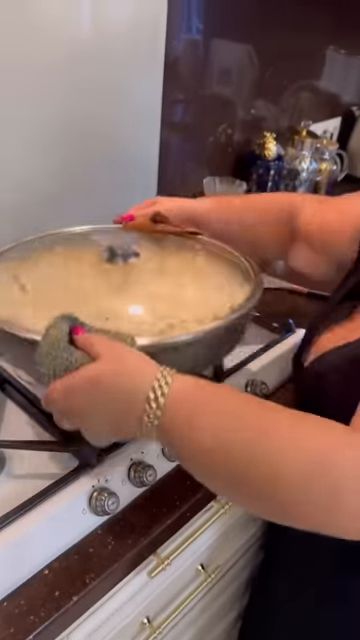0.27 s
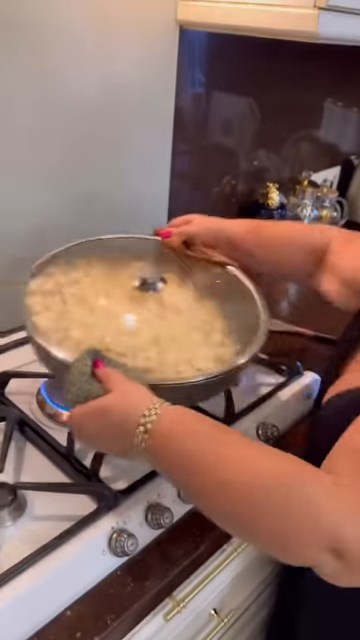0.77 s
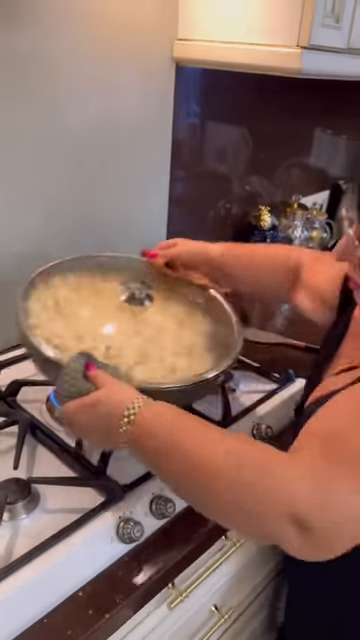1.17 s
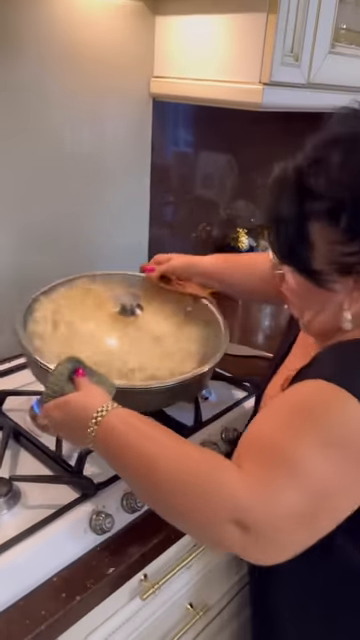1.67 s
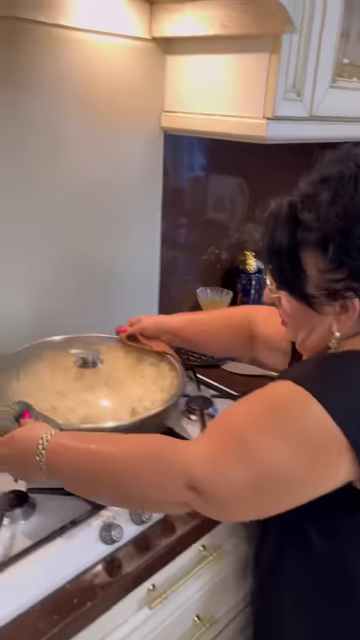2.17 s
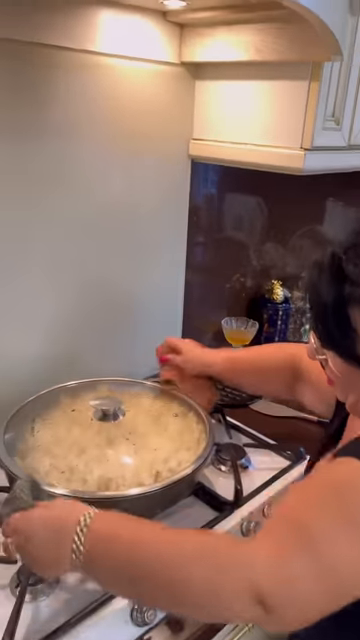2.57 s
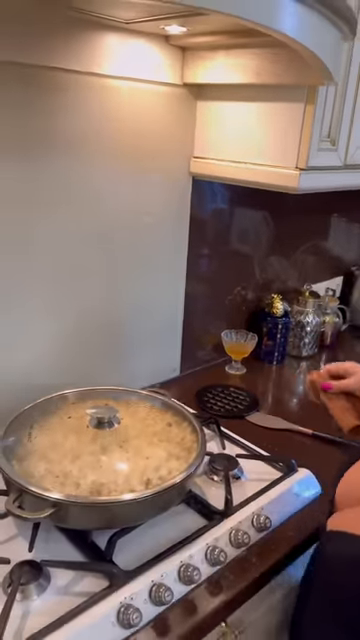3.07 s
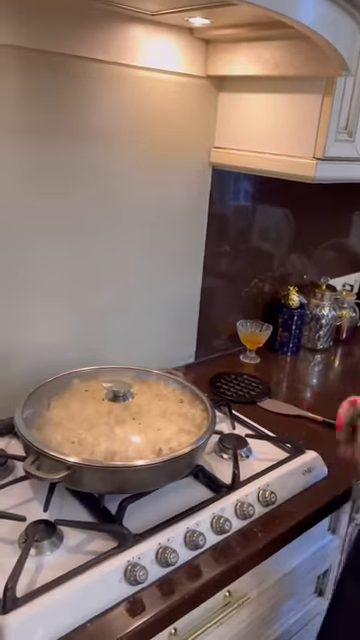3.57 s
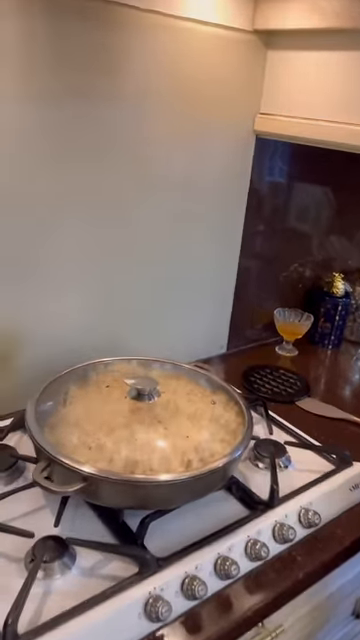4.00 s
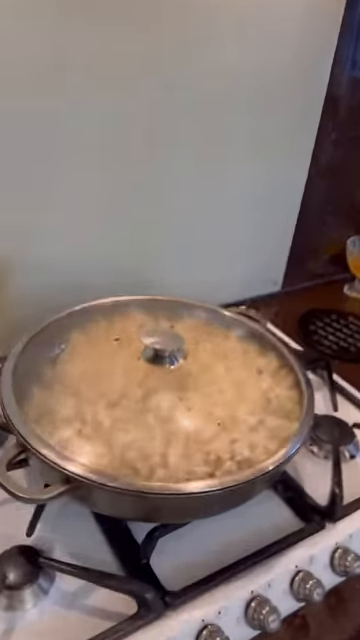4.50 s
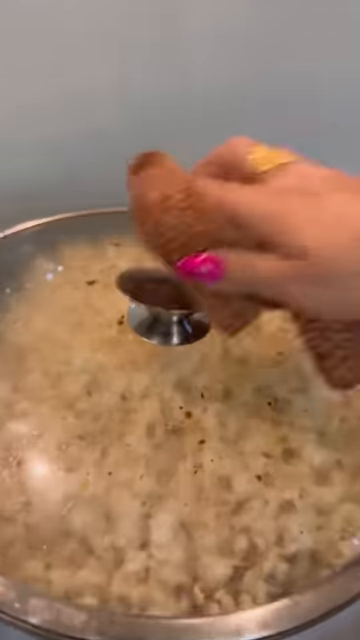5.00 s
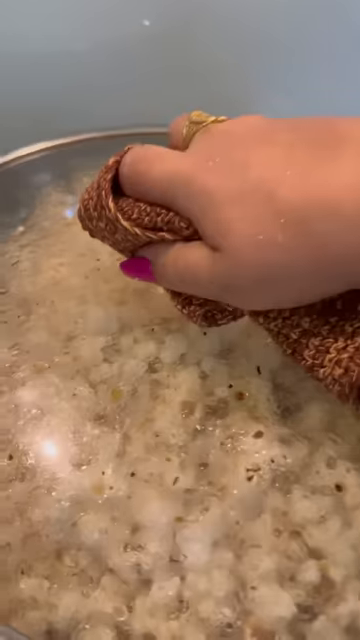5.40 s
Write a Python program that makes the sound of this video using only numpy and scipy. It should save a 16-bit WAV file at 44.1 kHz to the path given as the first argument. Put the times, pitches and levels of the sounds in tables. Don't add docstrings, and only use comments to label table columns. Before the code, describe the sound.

A wide lidded pan of popcorn is heard close up in a small, slightly reverberant kitchen. From 0 s, irregular dry cracks and hollow low thumps come through a breathy gas and steam hiss, with loose corn rustling in surges as the pan is carried; the hiss is strongest from about 0.5 to 1.9 s. Around 1.5 to 2 s the heavy base drags dully over the grate. At 2.0 s its edge knocks with quick bounces, and at 2.2 s the full base lands in a louder, deeper metallic clank, rattling and rocking until about 2.4 s. The hiss then thins, and muffled pops continue in small clusters until 4.5 s. From 4.6 s the microphone is close above the lid: snaps are brighter and louder, notably near 4.67 and 5.34 s, with glassy ticks and splinters. From 5.5 s the lid rocks with low bumps and ticks as hiss rises again.

```python
import sys
import numpy as np
from scipy import signal
from scipy.fft import rfft, irfft, next_fast_len
from scipy.io import wavfile

SR = 44100
rng = np.random.default_rng(int(sys.argv[2]) if len(sys.argv) > 2 else 0)


def to_linear_factor(level_db):
    exponent = np.asarray(level_db, float) / 20
    return 10 ** exponent


def dump(signal):
    limited = np.clip(np.atleast_2d(signal).T, -1, 1)
    pcm = np.round(limited * 32767).astype(np.int16)
    wavfile.write(sys.argv[1], SR, pcm)


N = 249045
BURST = 6144
STEP, RUN_IN = 32, 3000
LEFT_RIGHT = np.array([[1], [-1]])


def rms_one(x):
    return x / np.sqrt(np.mean(x ** 2) + 1e-20)


def peak_one(x):
    return x / np.abs(x).max()


def at_hz(points, hz):
    table_hz, values = np.array(points).T[:2]
    return np.interp(np.log(hz), np.log(table_hz + 1), values)


def in_time(rows, step=1, outside=None):
    s, *columns = np.transpose(rows)
    t = np.arange(0, N, step) / SR
    return [np.interp(t, s, column, outside, outside) for column in columns]


def drift(rate_hz):
    r = np.exp(-2 * np.pi * STEP * rate_hz / SR)
    white = rng.standard_normal(len(range(0, N, STEP)) + RUN_IN)
    return rms_one(signal.lfilter([1], [1, -2 * r, r * r], white)[RUN_IN:])


def ring(clicks, hz, t60):
    r = to_linear_factor(-60 / (max(t60, .002) * SR))
    w = 2 * np.pi * hz / SR
    return signal.lfilter([0, np.sin(w)], [1, -2 * r * np.cos(w), r * r], clicks + 1e-18)


def band(x, low_hz, high_hz):
    return signal.sosfilt(signal.butter(2, [low_hz, high_hz], "band", fs=SR, output="sos"), x)


def top_cut(x, hz):
    return signal.sosfilt(signal.ellip(12, .3, 85, hz, fs=SR, output="sos"), x)


def add(out, s, sound):
    i = round(s * SR)
    out[i:i + len(sound)] += sound[:N - i]


def blow(t, s, rise, t60):
    age = np.maximum(t - s, 0)
    return (1 - np.exp(-age / max(rise, 1e-4))) * to_linear_factor(-60 * age / t60)


def grains(per_s, spread_db):
    sizes = to_linear_factor(spread_db * np.minimum(rng.exponential(1, N), 5)) * rng.choice([-1, 1], N)
    return rms_one(sizes * (rng.random(N) < per_s / SR))


# start_s, crack_db, steam_puff_db, cavity_thump_db
CARRIED_POPS = [(0.1312, -28.5, -56, -64), (0.143, -20.5, -27.5, -37.5), (0.2095, -24.5, -54, -58),
                (0.3716, -36, -57, -28.5), (0.5317, -23, -48, -36), (0.6135, -35, -51, -54),
                (0.6956, -36, -52, -24), (0.7535, -27, -34, -35), (1.4122, -26.5, -38, -31),
                (1.4746, -32, -46, -27), (1.713, -26, -37, -27.5), (2.175, -35, -33.5, -45)]
# start_s, crack_db, steam_puff_db, cavity_thump_db
RESTING_POPS = [(2.367, -33, -38, -34), (2.508, -43, -50, -40), (2.582, -33, -40.5, -26),
                (2.749, -27.5, -35.5, -23), (2.8883, -43, -47, -57), (2.9333, -32.5, -32.5, -33),
                (3.1625, -28, -39, -27), (3.277, -33, -41, -33.5), (3.31, -30, -42.5, -38),
                (3.47, -37, -49, -32), (3.5421, -37, -45.5, -32), (3.5717, -37, -38.5, -33),
                (3.602, -23, -30.5, -34), (3.649, -33.5, -38.5, -31), (3.7333, -37.5, -48.5, -26.5),
                (3.8582, -46, -52, -33), (3.912, -32, -34, -29.5), (3.938, -37, -64, -43),
                (3.989, -23.5, -31.5, -31), (4.0002, -31, -51, -35), (4.081, -39.5, -50, -33),
                (4.187, -43, -36.5, -30), (4.266, -43, -46.5, -50), (4.2838, -36, -41.5, -45),
                (4.388, -35.5, -51, -41), (4.406, -35, -42, -35), (4.439, -36.5, -45, -58),
                (4.5158, -36.5, -45, -44)]
# start_s, crack_db, steam_puff_db, cavity_thump_db
CLOSE_POPS = [(4.5963, -22.5, -30, -21), (4.6126, -23.5, -57, -30), (4.648, -29, -33, -23),
              (4.6599, -17.5, -36, -25), (4.6694, -16.5, -39, -45), (4.725, -23.5, -30, -23.5),
              (4.801, -22, -36, -27), (4.8798, -35.5, -46, -25), (4.9938, -52, -45, -64),
              (5.1409, -27.5, -28, -30), (5.1609, -33, -40, -53), (5.245, -39, -46, -34),
              (5.328, -24.5, -34.5, -42), (5.3382, -12.5, -28.5, -28), (5.367, -54, -45, -37),
              (5.4586, -29.5, -30, -15.5), (5.4819, -32, -60, -40), (5.4998, -25.5, -37, -17),
              (5.5106, -31.5, -41, -42), (5.5243, -34, -40, -25), (5.564, -42, -32, -38),
              (5.6136, -30, -37, -45)]
POPS = CARRIED_POPS + RESTING_POPS + CLOSE_POPS
# pitch_hz, level_db, t60_s
LID_AIR = [(810, 0, .04), (1300, 0, .035), (1770, 0, .03), (2220, 0, .03), (2680, -4, .022),
           (3400, -5, .02), (4200, -11, .015)]


def cracks(air_db=-4.5, puff_db=12.5, snap_t60=0.0037, spurt_t60=0.092, jet_t60=0.012, spread=0.9):
    out, t = np.zeros((2, N)), np.arange(BURST) / SR
    split_at = [0, round(0.00024 * SR)]
    for s, level_db, bright_db, _ in POPS:
        tail_db = -10.5 - 0.36 * (level_db + 40.0)
        shape = blow(t, 0, .0001, snap_t60) + to_linear_factor(tail_db) * blow(t, 0, 0.00084, spurt_t60)
        jet_shape = blow(t, 0, 0.00042, jet_t60) + to_linear_factor(tail_db + 4.5) * blow(t, 0, 0.0025, spurt_t60)
        spurt, jet, scatter = rng.standard_normal((3, BURST)) * [shape, jet_shape, jet_shape]
        split_db = 4.0 + 0.65 * (level_db + 20.0)
        spurt[split_at] = to_linear_factor(split_db) * np.array([1, -2.1])
        air = 0
        for (hz, db, t60), uneven_db in zip(LID_AIR, 2 * rng.standard_normal(len(LID_AIR))):
            air = air + to_linear_factor(db + uneven_db) * peak_one(ring(spurt, hz, t60))
        body = to_linear_factor(-4.5) * peak_one(band(spurt, 1060, 2810))
        body += to_linear_factor(air_db) * peak_one(band(air, 480, 16000))
        steam = band(np.array([jet, scatter * to_linear_factor(-60 * t / 0.033)]), 4540, 14200)
        puff, glance = to_linear_factor(bright_db + puff_db) * peak_one(steam)
        centre = to_linear_factor(level_db) * body + puff
        add(out[0], s, centre + spread * glance)
        add(out[1], s, centre - spread * glance)
    return out


# start_s, level_db
BURIED_POPS = [(0.115, -27), (0.301, -29.5), (0.361, -31.5), (0.482, -34), (0.719, -36), (0.775, -31),
               (0.837, -40), (0.957, -53), (1.095, -33), (1.179, -42), (1.272, -42), (1.854, -33),
               (2.639, -34), (2.84, -38), (3.237, -34), (3.332, -46), (3.836, -40), (4.277, -29),
               (4.689, -29), (4.779, -28), (4.829, -21.5), (4.908, -32)]
# start_s, level_db, cavity_hz, knock_db (relative to the thump)
LID_JUMPS = [
    (0.208, -25, 130, -12.5),
    (1.089, -29, 375, -41),
    (5.16, -22.5, 140, -2.5),
    (2.222, -20.5, 142, 0.5),
    (2.293, -23, 131, -24),
    (5.5232, -13.5, 290.5, -23),
    (5.58, -17.5, 357, -22),
    (5.619, -29, 275, -10),
]
CAVITY_HZ, CAVITY_SPREAD, THUMP_LAG_S = 145, .09, -0.00097


def thump_rows():
    rows = []
    for s, crack_db, _, db in POPS:
        rows.append((s + THUMP_LAG_S, db, -10 + 0.43 * np.clip(crack_db - db, -15, 20)))
    rows += [(s, db, -18) for s, db in BURIED_POPS]
    pitched = []
    for s, db, knock_db in rows:
        hz = CAVITY_HZ * np.exp(CAVITY_SPREAD * rng.standard_normal())
        pitched.append((s, db, hz, knock_db))
    return pitched + LID_JUMPS


def thumps(swing_t60=0.096, push_s=0.0038, slap_s=0.0016, knock_t60=0.1):
    out, t = np.zeros(N), np.arange(BURST) / SR
    push, slap = (np.sin(np.pi * np.minimum(t / s, 1)) ** 2 for s in (push_s, slap_s))
    slap = peak_one(band(slap, 194, 348))
    for s, level_db, hz, knock_db in thump_rows():
        swing = peak_one(ring(ring(push, hz, 0.0045), hz, swing_t60))
        swing += to_linear_factor(-6.5) * peak_one(ring(push, hz * 1.475, swing_t60))
        rattle = band(rng.standard_normal(BURST) * blow(t, 0, 0.0003, knock_t60), 300, 820)
        knock = peak_one(rattle) + 1.2 * slap
        add(out, s + 0.0008, to_linear_factor(level_db - 3.5) * (peak_one(swing) + to_linear_factor(knock_db + 3.0) * knock))
    return out


# start_s, peak_db, pitch_hz, t60_s
SNAPS = [(.143, -35, 12500, .03), (2.173, -26, 11000, 0.0067), (2.9332, -30, 12500, .006),
         (3.1623, -30, 12500, .006), (3.5725, -33, 12500, .006), (3.6494, -30, 12500, .006),
         (3.989, -39, 12000, .005), (4.6484, -40, 12500, .02), (4.6594, -40, 12500, .03),
         (4.6696, -17, 2500, 0.0042), (4.669, -41, 12500, .03), (4.725, -42, 12500, .01),
         (5.141, -27, 12500, .05), (5.3348, -40, 12600, .012), (4.6625, -25, 6500, .01),
         (4.6686, -11, 5940, 0.0062), (4.6715, -24, 6400, .04), (4.615, -33, 1500, .04),
         (4.672, -22, 1500, 0.031), (4.690, -48, 1600, 0.025), (4.7275, -21, 7500, 0.022),
         (4.744, -47, 1200, 0.044), (4.8038, -32, 2200, .025), (4.832, -43, 1500, 0.064),
         (4.8335, -43, 7000, .02), (5.1464, -23, 5800, .02), (5.162, -16.5, 7450, 0.004),
         (5.161, -27, 13000, 0.032), (5.3345, -13.5, 7500, 0.0045), (5.3343, -24.5, 2020, 0.0036),
         (5.3497, -27, 6500, 0.01), (5.4595, -21, 13000, .006), (5.544, -41, 1500, .015),
         (5.5693, -49, 2500, .015), (5.5935, -39, 1500, 0.016), (5.598, -34, 1800, .015),
         (5.6058, -48, 1500, .015), (5.6205, -39, 2000, .015), (5.6258, -37, 2000, 0.013),
         (5.631, -30, 3500, 0.017), (5.6374, -38, 2000, .015)]


def snaps(half_width_octaves=0.48):
    out, t = np.zeros(N), np.arange(BURST) / SR
    ratio = 2 ** half_width_octaves
    for s, level_db, hz, t60 in SNAPS:
        burst = rng.standard_normal(BURST) * blow(t, 0, 0.00018, t60)
        add(out, s, to_linear_factor(level_db) * peak_one(band(burst, hz / ratio, min(hz * ratio, .45 * SR))))
    return out


# start_s, pitch_hz, peak_db, t60_s
CLINKS = [(0.2095, 1400, -33, .01), (1.03, 992, -50, 0.45), (1.045, 378, -45.5, 0.66),
          (1.085, 990, -49, .3), (1.2, 804, -53, .3), (1.36, 368.5, -46, 0.34), (1.411, 790, -31, 0.049),
          (1.414, 1740, -42, .06), (1.987, 930, -34, 0.1), (2.005, 312, -28, .12),
          (2.032, 242, -24.5, 0.21), (2.008, 688, -29, 0.088), (2.045, 330, -26, .15),
          (2.114, 293, -30, .1), (2.221, 660, -19.5, 0.13), (2.222, 140, -15, 0.14),
          (2.226, 836, -22, 0.088), (2.238, 590, -19.5, 0.26), (2.265, 80, -31, .5),
          (2.251, 233.5, -23.5, 0.25), (2.3, 202, -29, 0.18), (2.312, 134.5, -21, 0.28),
          (2.361, 279, -33, .2), (4.186, 1580, -43, 0.097), (4.223, 1350, -43, 0.043),
          (4.6715, 1284, -26, .06), (4.733, 800, -37, 0.056), (4.752, 794, -38, 0.048),
          (4.669, 2510, -7.5, 0.0053), (4.6687, 4400, -15.5, .003), (4.6681, 7000, -24, .003),
          (4.6717, 1620, -32, .05), (5.1612, 700, -32, 0.012), (5.179, 1380, -39, .02),
          (5.264, 1490, -46, 0.032), (5.3378, 910, -25, 0.015), (5.461, 2150, -40, .03),
          (5.5, 810, -40, .06), (5.526, 850, -33.5, .06), (5.545, 1360, -45, .03),
          (5.565, 1380, -43, 0.054), (5.601, 1330, -41, 0.045), (5.622, 1820, -38, .06),
          (5.634, 403, -38, .06)]


def clinks():
    out, click = np.zeros(N), np.eye(1, 4 * BURST)[0]
    for s, hz, level_db, t60 in CLINKS:
        add(out, s, to_linear_factor(level_db) * peak_one(ring(click, hz, t60)))
    return out


# start_s, pitch_hz, peak_db, t60_s
TICKS = [(0.128, 1360, -35.5, 0.049), (0.689, 2040, -36, 0.084), (3.9148, 1610, -37, 0.036),
         (4.184, 1570, -37.5, 0.054), (4.185, 4270, -41, 0.094), (4.922, 1450, -42, 0.036),
         (5.362, 770, -48, 0.056), (5.4757, 1354, -29, 0.065), (5.508, 1340, -33, 0.069),
         (5.524, 1345, -33, 0.085), (5.612, 1816, -35, 0.071), (5.617, 1350, -36, 0.078),
         (5.631, 1790, -33, 0.023)]


def ticks():
    out, t = np.zeros(N), np.arange(BURST) / SR
    for s, hz, level_db, t60 in TICKS:
        scuff = rng.standard_normal(BURST) * blow(t, 0, 0.00011, 0.018)
        add(out, s, to_linear_factor(level_db) * peak_one(ring(scuff, hz, t60)))
    return out


# start_s, level_db, judder_rise_s, judder_t60_s
KNOCKS = [
    (1.984, -18.5, 0.015, 0.12),
    (2.218, -14, 0.0077, 0.13),
    (2.292, -24, 0.11, 0.3),
]
# pitch_hz, level_db, t60_s
FIRST_BODY = [(192, -28, 0.66), (242, -6, 0.3), (302, -2.5, 0.28), (330, 1, 0.23), (410, -30, 0.28),
              (493, -2.5, 0.12), (580, -12, 0.21), (694, -8, 0.2), (945, -18, 0.27), (982, -15, 0.73),
              (1333, -25, 0.33)]
# pitch_hz, level_db, t60_s
FULL_BODY = [(80, 0, 0.6), (140, -18, 0.11), (232, -2, 0.37), (359, 0, 0.32), (450, -10, 0.24),
             (515, 1, 0.34), (594, 2, 0.55), (650, -15, 0.1), (730, -8, 0.62), (858, 8.5, 0.12),
             (930, -15, .15), (982, 8, 0.12), (1100, -20, .3), (1270, -23, 0.35)]
# pitch_hz, level_db, t60_s
SETTLE_BODY = [(80, 1.5, 0.39), (134, 4, 0.33), (197, -3, 0.17), (273, -1, 0.25), (349, -14, 0.3),
               (530, -6, 0.66), (600, -17, 0.45), (660, -7, 0.22), (717, -14, 0.26)]
# start_s, level_db
FIRST_CONTACTS = [(1.992, -13), (1.998, 5), (2.001, 1.5), (2.008, 0), (2.015, -8), (2.022, 4.5), (2.03, -2),
                  (2.036, -9), (2.048, -13), (2.0607, -10)]
# start_s, level_db
FULL_CONTACTS = [(2.2182, -5), (2.2218, 9), (2.2302, 11), (2.2385, 1), (2.2454, 0), (2.2525, -9),
                 (2.2623, -16), (2.2688, -10.5), (2.275, -12), (2.2854, -10), (2.2907, -18)]
# start_s, level_db
SETTLE_CONTACTS = [(2.2984, 2), (2.307, 7), (2.3145, -12), (2.3241, -1), (2.338, 3), (2.3413, 5),
                   (2.352, -16), (2.371, -6)]


def knocks(ring_db=-1.0, judder_db=-10.0, clack_db=-5.0):
    out, t = np.zeros(N), np.arange(N) / SR
    bodies = (FIRST_BODY, FULL_BODY, SETTLE_BODY)
    bounces = (FIRST_CONTACTS, FULL_CONTACTS, SETTLE_CONTACTS)
    for (s, level_db, rise, t60), body, contacts in zip(KNOCKS, bodies, bounces):
        judder = to_linear_factor(judder_db) * peak_one(grains(450.0, spread_db=6.0) * blow(t, s, rise, t60))
        contact_s, hit_db = np.transpose(contacts)
        at = (contact_s * SR).astype(int)
        hits, rings = np.zeros(N), 0
        hits[at] = to_linear_factor(hit_db)
        uneven = rng.standard_normal((len(at), len(body)))
        for (hz, db, decay), share in zip(body, uneven.T):
            strikes = judder.copy()
            strikes[at] += to_linear_factor(hit_db + 3.6 * share)
            rings = rings + to_linear_factor(db) * ring(strikes, hz, np.clip(decay, .03, .7))
        clack = band(band(hits, 380, 1550), 280, 2500)
        knock = to_linear_factor(ring_db) * peak_one(rings) + to_linear_factor(clack_db) * peak_one(clack)
        out += to_linear_factor(level_db + 4.0) * knock
    return out


DRAG_S, DRAG_DB, DRAG_EASE_DB, DRAG_EDGE_DB = 1.47, -38, -12, -34
DRAG_RISE_S, DRAG_HOLD_S, DRAG_EASE_S, DRAG_CREEP_S = 0.035, 0.07, 0.18, 0.26


def drag():
    slips = grains(900.0, spread_db=2.0)
    s = DRAG_S + np.cumsum([0, DRAG_RISE_S, DRAG_HOLD_S, DRAG_EASE_S, DRAG_CREEP_S, DRAG_RISE_S / 2])
    db = DRAG_DB + np.array([DRAG_EDGE_DB, 0, 0, DRAG_EASE_DB, DRAG_EASE_DB, DRAG_EDGE_DB])
    level_db = in_time(np.transpose([s, db]), outside=-120)[0]
    grate = ring(slips, 257, 0.12) + 1.36 * ring(slips, 330, 0.043)
    return to_linear_factor(level_db + 4.5) * rms_one(grate)


# start_s, level_db
STEAM = [(0.0, -48), (0.12, -52.5), (0.3, -49.5), (0.55, -40), (0.69, -38.5), (1.07, -38.5), (1.57, -40),
         (1.82, -39.5), (2.03, -47), (2.25, -42.5), (2.41, -52.5), (2.99, -49), (3.52, -55), (4.55, -55),
         (4.8, -50.5), (5.44, -52), (5.57, -43), (5.65, -40)]
# centre_s, extra_rustle_db, extra_hiss_db, extra_far_pops_db, half_width_s
JOLTS = [
    (.14, 8.5, 9.5, 0, 0.078),
    (.3, 10, 7.5, -3, 0.081),
    (.74, 4, 6.5, 5, 0.059),
    (1.12, 0, 1.5, 0.5, 0.073),
    (1.58, 6, 4, 4, 0.083),
    (2.09, 9, -6.5, -1, 0.06),
    (2.27, -0.5, -4.5, 22, 0.11),
    (4.77, 1.5, -2, 10, 0.14),
    (5.579, -2, 0.5, 9, 0.18),
]
MIDDLING_STEAM_DB = -47
RUSTLE_DB, RUSTLE_FOLLOWS = -49.5, 0.61
FAR_POPS_DB, FAR_FOLLOWS = -55, 0.06


def bed_levels(step):
    hiss, t = in_time(STEAM, step)[0], np.arange(0, N, step) / SR
    swing = hiss - MIDDLING_STEAM_DB
    rustle = RUSTLE_DB + RUSTLE_FOLLOWS * swing
    muffled = FAR_POPS_DB + FAR_FOLLOWS * swing
    for s, rustle_db, hiss_db, far_db, width in JOLTS:
        bump = np.exp(-((t - s) / width) ** 2)
        hiss = hiss + hiss_db * bump
        rustle = rustle + rustle_db * bump
        muffled = muffled + far_db * bump
    return hiss, rustle, muffled


# pitch_hz, level_db, t60_s
PAN_WALL = [(375, 4, 0.7), (651, 1, 0.44), (984.6, 1.5, 0.24), (1488, 5.5, 0.03), (1993, -0.5, 0.12),
            (2213, 1, 0.25), (2660, -1, 0.08), (3646, 0, 0.19), (4520, 1.5, 0.11), (5640, -1.5, 0.023),
            (5900, -17.5, 0.036), (6380, -5, 0.11), (7100, 4, 0.02)]


def sliding_corn(level_db=-6.0):
    touches = grains(900.0, spread_db=3.0)
    tones = sum(to_linear_factor(db) * rms_one(ring(touches, hz, t60)) for hz, db, t60 in PAN_WALL)
    return to_linear_factor(bed_levels(1)[1] + level_db) * rms_one(tones)


BANDS_HZ = 28 * 2 ** np.arange(0, 9.4, .4)


def power_share(spectrum, level_db, hz):
    total = np.sum(to_linear_factor(at_hz(spectrum, BANDS_HZ)) ** 2 * BANDS_HZ)
    return to_linear_factor(level_db + at_hz(spectrum, hz)) ** 2 * hz / total


# pitch_hz, level_db (per Hz)
HISS = [(1500, -19.5), (3000, -5.5), (4200, -7.5), (5200, -0.5), (7000, -4), (9000, -1.5), (11000, -3.5),
        (13000, -13), (16000, -2.5)]
# pitch_hz, level_db (per Hz)
RUSTLE = [(250, -22), (400, -1.5), (600, 3), (1000, -1.5), (2000, -1.5), (3500, -20), (5000, -39),
          (9000, -10)]
# pitch_hz, level_db (per Hz)
MUFFLED = [(25, 5), (60, -5), (100, 2), (140, 4), (200, -1), (300, -0.5), (500, -28), (1000, -44)]
# pitch_hz, level_db (per Hz)
FIRST_CLATTER = [(60, -45), (120, -42), (200, -5), (280, -7), (500, -7), (1100, -18), (1600, -19),
                 (2000, -12.5), (4200, -25.5), (9000, -29), (16000, -30)]
# pitch_hz, level_db (per Hz)
FULL_CLATTER = [(50, -7), (120, -11), (250, -6), (400, -8.5), (600, -3), (1300, -12), (3000, -16.5),
                (5500, -20), (9000, -20), (13000, -34), (16000, -22)]
# pitch_hz, level_db (per Hz)
SETTLE_CLATTER = [(60, -32), (120, -21), (250, -10), (500, -15), (1100, -22), (2500, -14.5), (9000, -27),
                  (16000, -22)]
# pitch_hz, t60_s
CLATTER_T60 = [(60, 0.87), (600, 0.58), (2000, 0.35), (10000, 0.29)]
# pitch_hz, likeness (0-1)
LIKENESS = [(60, .998), (150, .99), (290, .96), (640, .62), (1000, .85), (1400, .96), (1800, .99),
            (2400, .96), (3100, .7), (4100, .6), (5400, .84), (7200, .995), (8500, .97), (10500, .999),
            (13500, .999), (16500, .9)]


def diffuse_noise(hiss_db=5.0, rustle_db=0.0, muffled_db=3.0):
    hiss, rustle, muffled = bed_levels(STEP)
    t, together = np.arange(0, N, STEP) / SR, drift(9.0)
    white, out = rng.standard_normal((2, 2, N)), 0
    clatters = (FIRST_CLATTER, FULL_CLATTER, SETTLE_CLATTER)
    for k, hz in enumerate(BANDS_HZ):
        mid, side = rms_one(band(white[k % 2], hz / 2 ** .2, min(hz * 2 ** .2, .45 * SR)))
        power = power_share(HISS, hiss + hiss_db, hz)
        power += power_share(RUSTLE, rustle + rustle_db, hz)
        power += power_share(MUFFLED, muffled + muffled_db, hz)
        power *= to_linear_factor(1.1 * together + 1.4 * drift(13.2) + 0.69 * drift(58.0)) ** 2
        for (s, level_db, rise, _), colour in zip(KNOCKS, clatters):
            tail = blow(t, s, rise, at_hz(CLATTER_T60, hz))
            power += power_share(colour, level_db + 0.7, hz) * tail ** 2
        alike = np.clip(at_hz(LIKENESS, hz), 0, 1)
        gain = np.interp(np.arange(N) / STEP, np.arange(len(t)), np.sqrt(power / 2))
        out = out + gain * (np.sqrt(1 + alike) * mid + np.sqrt(1 - alike) * side * LEFT_RIGHT)
    return out


KITCHEN_T60_S, WALL_CUT_HZ = 0.26, 15000


def kitchen(x):
    size = next_fast_len(N + SR)
    hz, out = np.fft.rfftfreq(size, 1 / SR), np.zeros((2, size // 2 + 1), complex)
    for k, lag in enumerate(.008 + .022 * rng.random(size=12)):
        loop = to_linear_factor(-60 * lag / KITCHEN_T60_S) * np.exp(-2j * np.pi * hz * lag - lag * 5.0 * hz / WALL_CUT_HZ)
        out[k % 2] += loop / (1 - loop) * (-1) ** (k // 2)
    return irfft(out * rfft(x, size), size)[:, :N]


# pitch_hz, difference_db
PORT_APART = [(9800, 0), (10900, -22), (13700, -22), (14600, 0)]


def same_wave(x):
    size = next_fast_len(N + BURST)
    alike, apart = rfft([x[0] + x[1], x[0] - x[1]], size) / 2
    apart = apart * to_linear_factor(at_hz(PORT_APART, np.fft.rfftfreq(size, 1 / SR) + 1))
    return irfft([alike + apart, alike - apart], size)[:, :N]


def scene():
    pan = cracks() + thumps() + ticks() + drag() + sliding_corn()
    pan = pan + knocks() * to_linear_factor(-0.6 * LEFT_RIGHT)
    sharp = snaps() + clinks()
    echo = band(kitchen(pan.mean(axis=0) + sharp), 440, 10500)
    leaning = sharp + 0.39 * LEFT_RIGHT * band(sharp, 460, 17000)
    return leaning + to_linear_factor(-17.5) * echo + same_wave(top_cut(pan + diffuse_noise(), 15760))


def band_limit(x):
    return signal.sosfilt(signal.butter(12, 17120, fs=SR, output="sos"), x)


# pitch_hz, left_lead_rad
PORT_LEAD = [(0, 0), (600, 0.3), (1890, -0.0), (3530, 0.4), (3880, 0.0), (4910, -3.1), (5430, -5.5),
             (5770, -6.2), (6800, -6.5), (9990, -8.6), (10900, -9.425), (13800, -9.425), (15700, -10.8),
             (16700, -12.1)]
# pitch_hz, left_minus_right_db
PORT_BALANCE = [(60, 0), (200, 1), (700, 2.5), (1300, 0.5), (2000, 0), (4400, 1), (6000, 0), (16000, 0)]


def record(dry):
    size = next_fast_len(N + BURST)
    hz = np.fft.rfftfreq(size, 1 / SR)
    lead = np.interp(hz, *np.transpose(PORT_LEAD))
    left = to_linear_factor(at_hz(PORT_BALANCE, hz + 1) / 2) * np.exp(.5j * lead)
    ports = irfft(rfft(dry, size) * [left, 1 / left], size)[:, :N]
    ports = top_cut(ports, 16900)
    ports = signal.sosfilt(signal.butter(N=4, Wn=58, btype="high", fs=SR, output="sos"), ports)
    return band_limit(ports)


dry = scene()
out = record(dry)
dump(out)
```